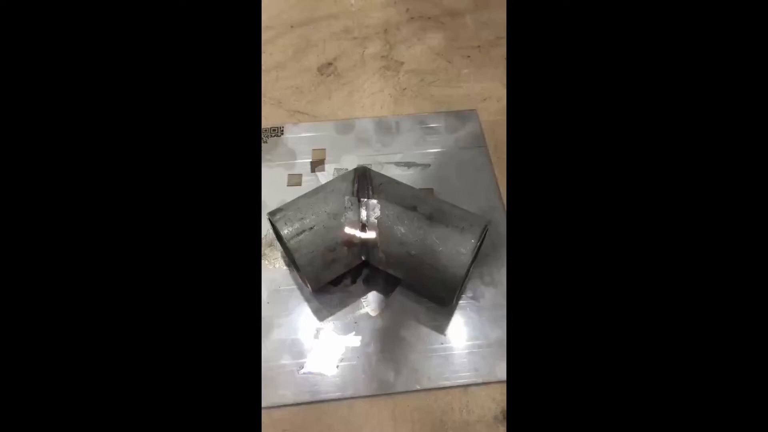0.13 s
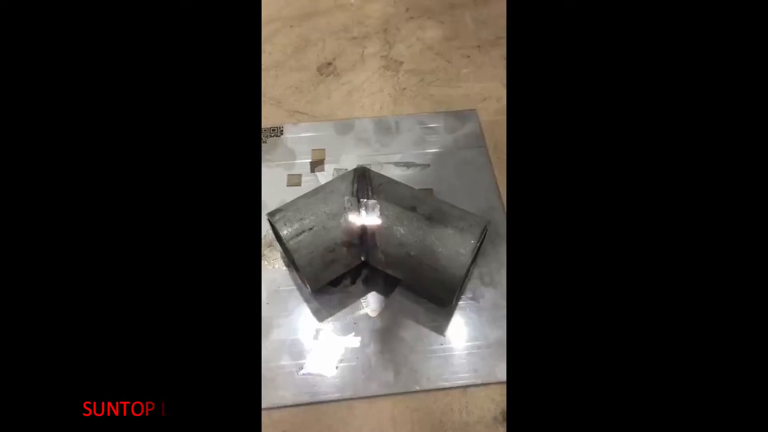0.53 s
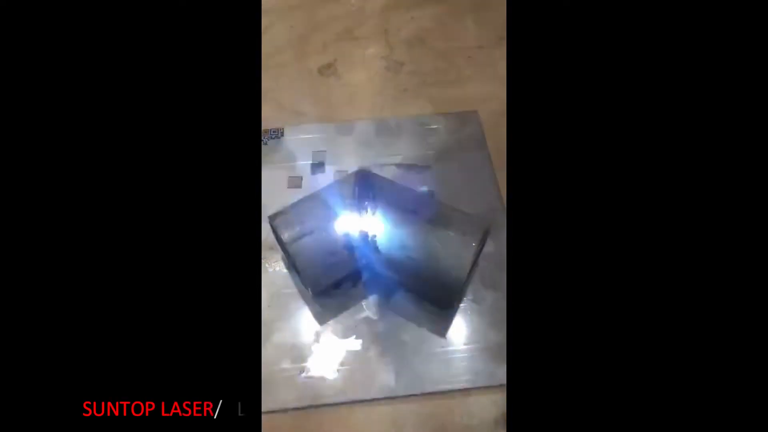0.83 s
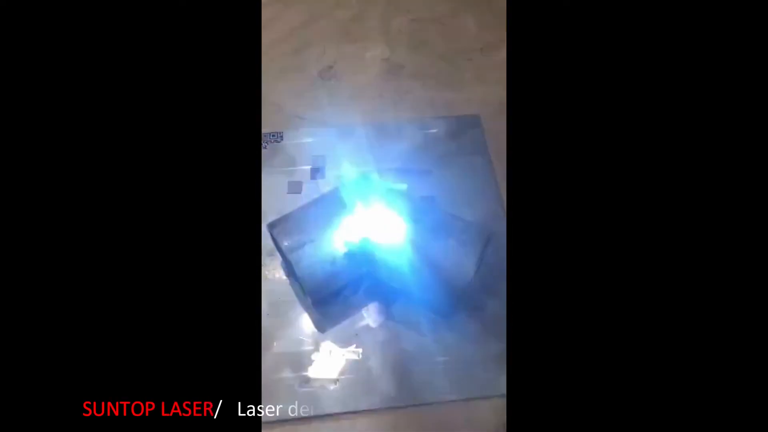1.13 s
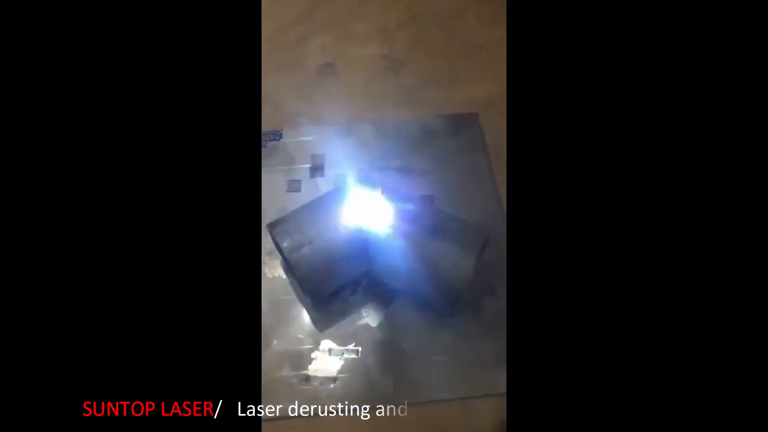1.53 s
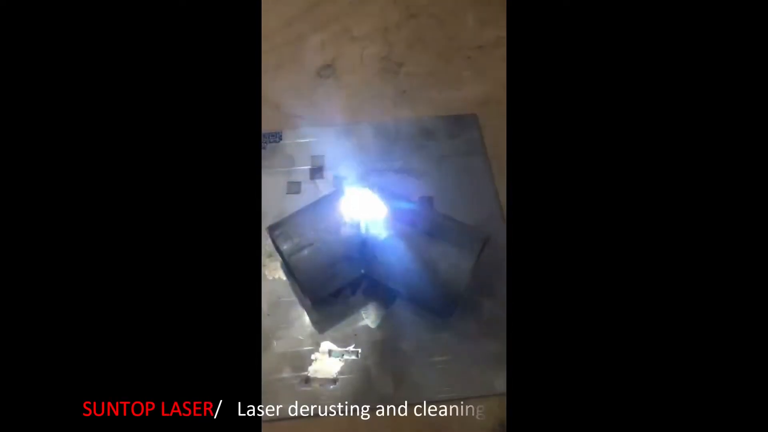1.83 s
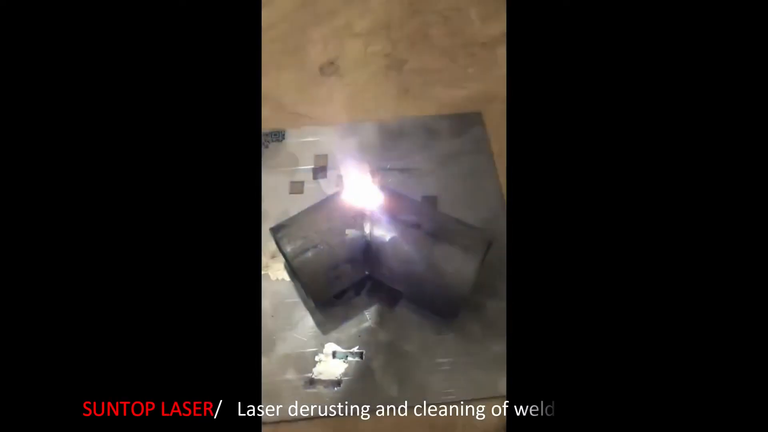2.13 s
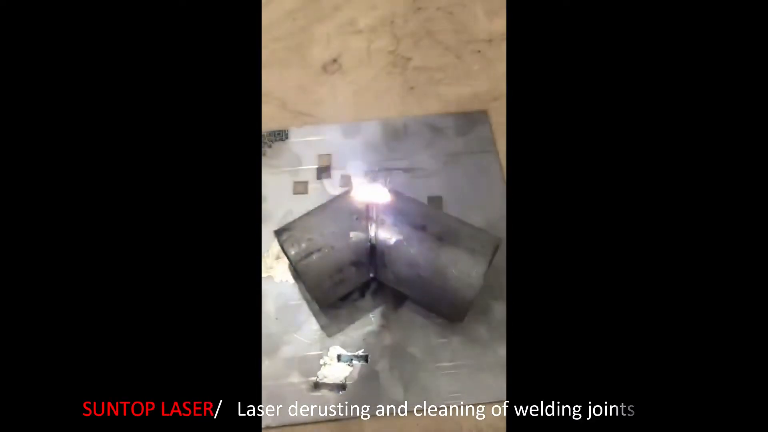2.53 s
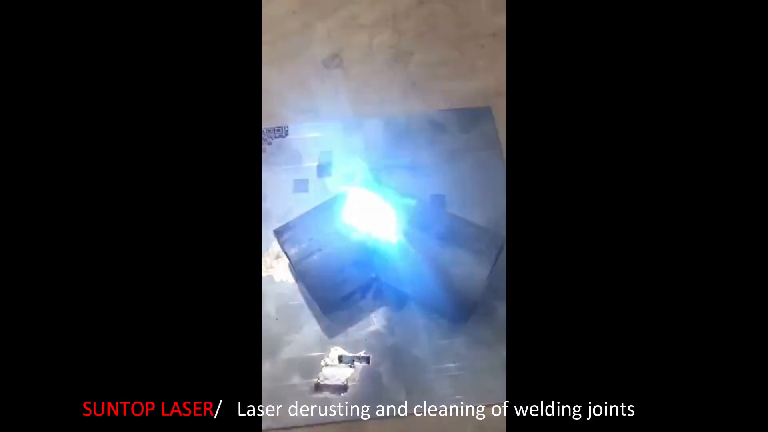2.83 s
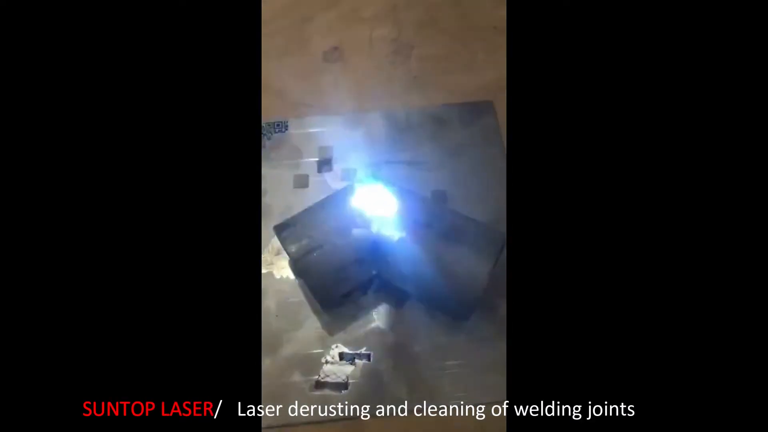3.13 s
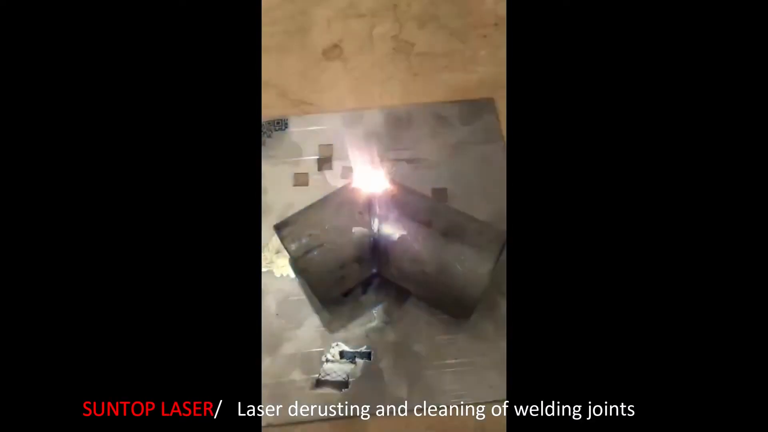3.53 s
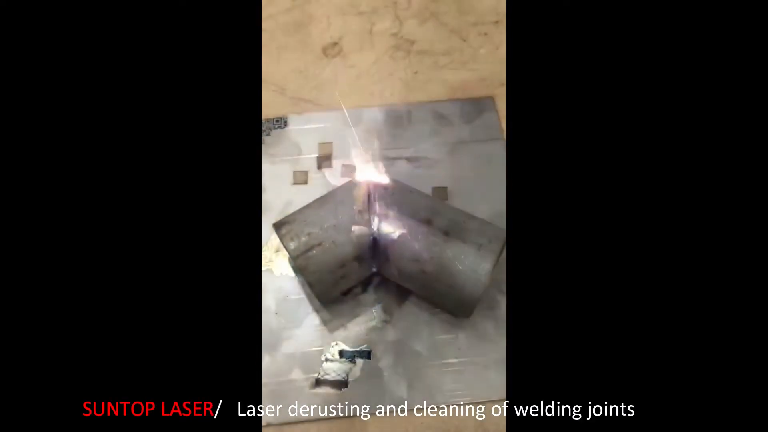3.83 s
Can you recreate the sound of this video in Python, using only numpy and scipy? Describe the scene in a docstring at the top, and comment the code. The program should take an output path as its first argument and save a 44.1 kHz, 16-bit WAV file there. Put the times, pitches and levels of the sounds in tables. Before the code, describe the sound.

A laser cleaning a steel pipe joint sizzles and hisses over a workshop fan's roar, then erupts in rough buzzing bursts and sharp cracks, loudest around two seconds and again near the end; close phone microphone, slightly overloaded.

```python
"""A sweeping pulsed laser burns a steel pipe joint clean, close to a phone microphone in a workshop.
The beam crosses the weld twice a sweep: pulses and grit pop, each crossing thumps and snaps, while noise
throbbing with the sweep makes sizzle and hiss, and sine lines whine. Lone flakes of scale crack off.
Behind is the roar of a cooling fan and extractor, coloured noise with wavering tones and a changing level.
The microphone rounds the loudest peaks and cuts the top."""
import sys
import numpy as np
from scipy import signal
from scipy.fft import rfft, irfft
from scipy.io import wavfile
from scipy.ndimage import uniform_filter1d

SR = 44100
rng = np.random.default_rng(int(sys.argv[2]) if len(sys.argv) > 2 else 0)


def output_pcm(signal):
    """Save a mono or channel-first signal as 16-bit PCM at the path in sys.argv[1].

    Samples are clipped to [-1, 1] before scaling.
    """
    pcm = np.clip(np.atleast_2d(signal).T, -1, 1) * 32767
    wavfile.write(sys.argv[1], SR, np.round(pcm).astype(np.int16))


N = 176400
t = np.arange(N) / SR

# Drift of the hand, which moves the two weld crossings apart and together.
# Each row: time in seconds, distance either side of the turning point in sweep cycles.
SEAM_DRIFT = [(1.0, 0.2), (2.15, .19), (3.3, 0.24), (3.6, 0.21)]
# Bursts on the weld. Each row: time in seconds, level of the pops in dB.
POP_LEVEL = [(1.06, -40), (1.09, -21.5), (1.13, -22), (1.15, -30), (1.3, -46.5), (1.43, -24.5), (1.51, -33),
             (1.55, -14), (1.56, -31), (1.59, -16.5), (1.6, -36), (1.7, -43), (1.72, -24.5), (1.8, -37),
             (1.82, -15.5), (1.85, -41), (1.95, -44), (1.97, -28), (2.05, -11), (2.08, -14.5), (2.1, -1.5),
             (2.12, -14), (2.14, -7), (2.157, -11), (2.165, -30), (2.175, -8), (2.18, -11), (2.28, -17),
             (2.3, -44), (2.32, -23.5), (2.36, -19.5), (2.38, -26), (2.4, -61), (2.42, -26), (2.44, -51),
             (2.63, -42.5), (2.7, -25.5), (2.76, -51), (3.06, -29), (3.21, -45), (3.24, -21), (3.29, -41),
             (3.31, -19.5), (3.38, -22.5), (3.41, -53), (3.43, -46), (3.45, -3), (3.46, -7), (3.553, -11),
             (3.56, -22), (3.58, -25), (3.6, -18.5), (3.62, -40), (3.66, -33), (3.67, -26.5), (3.7, -44),
             (3.75, -26.5), (3.78, -7.5), (3.79, -14.5), (3.815, -7), (3.822, -21), (3.84, -21),
             (3.87, -38)]
# Spectrum of the pops. Each row: frequency in Hz, density in dB per Hz.
POP_COLOUR = [(26, -70), (45, 1), (119, -2.5), (271, 0), (404, -3.5), (539, 0.5), (803, -5), (1050, -0.5),
              (1400, -8.5), (2100, -17.5), (3170, -35), (9000, -62)]
# Weight and edge of the bursts. Each row: time in seconds, low thump in dB, sharp snap in dB, both over the pops.
THUMP_SNAP_LEVEL = [(1.2, -2, -9), (1.5, -13.5, -12), (2.3, -15, -9), (2.7, -14, -3), (3.3, -4.5, -9),
                    (3.45, -2, -10.5), (3.6, -7.5, -6.5), (3.85, -7, -6)]
# Spectrum of the thump. Each row: frequency in Hz, density in dB per Hz.
THUMP_COLOUR = [(130, -2.5), (260, 0.5), (400, 3.5), (620, -11)]
# Steady burning. Each row: time in seconds, level of the sizzle in dB, level of the high hiss in dB.
BURN_LEVEL = [(0.15, -33.5, -58), (0.31, -30, -26.5), (0.37, -29, -38), (0.55, -31, -27),
              (0.71, -24.5, -19), (0.9, -32.5, -30.5), (0.99, -23, -19), (1.26, -28.5, -25),
              (1.46, -23, -19), (1.48, -17, -19.5), (1.62, -19, -20.5), (1.89, -20.5, -21),
              (2.04, -18, -19.5), (2.06, -13.5, -14), (2.1, -19.5, -22), (2.17, -27, -28.5),
              (2.21, -19, -27), (2.23, -17.5, -22.5), (2.32, -30, -32.5), (2.36, -23.5, -31.5),
              (2.39, -30, -30.5), (2.52, -38, -34.5), (2.7, -27, -22.5), (2.77, -33, -29),
              (2.92, -27.5, -23.5), (3.17, -26, -24), (3.3, -25, -24), (3.42, -29.5, -25.5),
              (3.45, -17, -16), (3.47, -11.5, -19), (3.54, -22.5, -25), (3.57, -29, -30),
              (3.65, -30.5, -32), (3.73, -30, -25.5), (3.81, -21, -20), (3.88, -30.5, -33),
              (3.944, -34, -29), (3.949, -19, -22), (3.975, -31, -34), (3.99, -33, -28), (4.0, -14, -23)]
# Spectrum of the sizzle, also of the rasp on the pops. Each row: frequency in Hz, density in dB per Hz.
SIZZLE_COLOUR = [(710, -31.5), (1200, -11), (1920, -5.5), (2010, -1), (2600, -4.5), (3000, -1),
                 (3200, -5.5), (3450, -2), (4770, -9.5), (7000, -11), (9100, -67)]
# Spectrum of the high hiss. Each row: frequency in Hz, density in dB per Hz.
HISS_COLOUR = [(2650, -5), (4500, -1), (4790, -15.5), (6210, -0.5), (6510, -15.5), (7170, -1.5),
               (10100, -3.5), (11400, -1), (14200, -4)]
# Whistling lines from the pulse rate and the sweep. Each row: frequency in Hz, relative level in dB.
WHINE_LINES = [(2062, -2), (2213, -11), (2322, 0), (2470, -10), (2738, -8), (2832, -8), (2990, -9),
               (3092, -6), (3353, -4), (4123, -10)]
# Strength of the whine. Each row: time in seconds, level over the sizzle in dB.
WHINE_LEVEL = [(.15, -12), (1.3, -13), (1.55, -5), (1.95, -1.5), (2.1, -15), (2.9, -8), (3.3, -17.5)]
# Single flakes of scale that crack off; the click sounds CRACK_DELAY_S after the time given.
# Each row: time in seconds, peak in dB ahead of the microphone.
CRACKS = [(2.177, 1), (2.185, 3), (2.418, -7), (2.691, -2), (3.447, 3), (3.566, -14), (3.59, 2.5),
          (3.625, -7), (3.632, -3.5), (3.871, -15), (3.9127, -4.5), (3.92, -15), (3.9468, 4), (3.9545, 1),
          (3.9622, 2), (3.97, -9), (3.9893, -6), (3.997, 10)]
# Spectrum of the cracks and snaps. Each row: frequency in Hz, density in dB per Hz.
CRACK_COLOUR = [(130, -2), (300, 1), (700, -1), (1500, -2.5), (3000, -6), (5000, -16.5), (10000, -32.5)]
# Fan and extractor behind. Each row: time in seconds, level of the roar with its tones in dB.
FAN_LEVEL = [(.14, -22.5), (1.0, -25), (1.54, -27), (1.93, -26), (2.1, -20.5), (2.3, -29), (2.5, -36),
             (2.75, -32.5), (3.21, -26), (3.4, -28), (3.52, -15), (3.71, -39.5), (3.82, -28), (3.88, -37.5),
             (4.0, -21)]
# Spectrum of the air roar. Each row: frequency in Hz, density in dB per Hz.
FAN_COLOUR = [(15, -41), (25, -15.5), (97, -4), (355, -16.5), (501, -16), (557, -11.5), (973, -15),
              (1140, -15.5), (1940, -19), (2160, -30), (4780, -20.5), (14200, -37)]
# Wavering tones in the roar. Each row: frequency in Hz, width in Hz, level beside the roar in dB.
FAN_TONES = [(109, 30, -0.5), (962, 3.2, -7), (994.3, 18.5, -6.5), (1953, 38, -10), (4150, 43, -17)]

PULSE_HZ, SWEEP_HZ = 1031.2, 130.2
SWEEP_SAMPLES = round(SR / SWEEP_HZ)
SWEEP_MID, SEAM_WIDTH, GLOW_WIDTH = 0.893, 0.051, 0.097  # sweep cycles: turning point, spreads about the weld
BACK_DB, THUMP_BACK_DB = -4.5, -7.5  # return crossing against the outward one
SIZE_REPEAT, POP_REPEAT, SIZZLE_REPEAT = 0.4, 0.71, 0.47  # share kept from one sweep to the next
POP_SCATTER_DB, POP_GRIT_DB, RASP_DB = 3.5, 3, -14  # pulse size, grit over pulses, bright edge
POP_LAG_HZ = 500  # corner below which the lows trail
SNAP_SCATTER_DB = 3.5
SIZZLE_GATE, HISS_GATE = 0.94, 0.36  # swell near the weld
THROB_HZ, THROB_PEAK_S, THROB_DEPTH = 21.6, 1.813, 0.61
WHINE_FLICKER_DB = 2.5
CRACK_DELAY_S, CRACK_TAIL_S, CRACK_TAIL_DB = 0.0014, 0.0037, -16.5
START_S, START_FADE_S = 0.1435, 0.00045
CLIP_AT, TOP_HZ = 1, 14050  # full-scale amplitude, microphone cutoff


def laser():
    """All the sound at the weld: bursts where scale blows off, and steady burning along the sweep."""
    effort = burst_level()
    smooth_effort = uniform_filter1d(effort, size=200)
    bursts = pops(effort)
    bursts = bursts + thump() * smooth_effort * curve(THUMP_SNAP_LEVEL)
    bursts = bursts + snaps() * smooth_effort * curve(THUMP_SNAP_LEVEL, axis=2)
    burning = (sizzle() + whine() * curve(WHINE_LEVEL)) * curve(BURN_LEVEL)
    return bursts + burning + hiss() * curve(BURN_LEVEL, axis=2)


def burst_level():
    """Gain of the bursts over time, silent outside the first and last table rows."""
    return curve(POP_LEVEL) * (t > POP_LEVEL[0][0]) * (t < POP_LEVEL[-1][0])


def pops(effort):
    """Laser pulses of uneven size and gritty noise, both strongest on the weld, coloured as pops."""
    at = np.arange(int(N / SR * PULSE_HZ)) / PULSE_HZ
    scatter = repeating(len(at), round(PULSE_HZ / SWEEP_HZ), SIZE_REPEAT)
    pulses = clicks(at, seam(at, SEAM_WIDTH, BACK_DB) * undb(POP_SCATTER_DB * scatter))
    grit = seam(t, SEAM_WIDTH, BACK_DB) * repeating(N, SWEEP_SAMPLES, POP_REPEAT)
    blows = (unit(grit) * undb(POP_GRIT_DB) + unit(pulses)) * effort
    body = colour(lows_late(blows), POP_COLOUR)
    rasp = undb(RASP_DB) * colour(blows, SIZZLE_COLOUR)
    # colour() evens out the level, so the overall strength is put back
    return (body + rasp) * np.sqrt(np.mean(effort ** 2))


def thump():
    """Low push each time the beam passes over the weld, weaker on the way back."""
    return colour(lows_late(seam(t, SEAM_WIDTH, THUMP_BACK_DB)), THUMP_COLOUR)


def snaps():
    """One sharp click each time the beam crosses the weld, weaker on average on the way back."""
    turn = (np.arange(int(N / SR * SWEEP_HZ)) + SWEEP_MID) / SWEEP_HZ
    apart = half_gap(turn) / SWEEP_HZ
    size = undb(SNAP_SCATTER_DB * rng.standard_normal((len(turn), 2)))
    outward = clicks(turn - apart, size[:, 0])
    back = clicks(turn + apart, size[:, 1] * undb(BACK_DB))
    return colour(lows_late(outward + back), CRACK_COLOUR)


def sizzle():
    """Flickering noise that partly repeats each sweep and swells near the weld."""
    swell = 1 + SIZZLE_GATE * seam(t, GLOW_WIDTH, 0)
    flicker = undb(2.02 * walk(200) + walk(14))
    return colour(swell * flicker * repeating(N, SWEEP_SAMPLES, SIZZLE_REPEAT), SIZZLE_COLOUR)


def whine():
    """Steady whistling sine lines that throb together and flicker alone."""
    throb = 1 + THROB_DEPTH * np.cos(2 * np.pi * THROB_HZ * (t - THROB_PEAK_S))
    lines = np.zeros(N)
    for hz, db in WHINE_LINES:
        level = undb(db + WHINE_FLICKER_DB * walk(24.88))
        lines += level * np.sin(2 * np.pi * (hz * t + rng.random()))
    return unit(throb * lines)


def hiss():
    """High noise that flickers freely and swells a little near the weld."""
    swell = 1 + HISS_GATE * seam(t, GLOW_WIDTH, 0)
    flicker = undb(1.32 * walk(300) + 2.0 * walk(14))
    return colour(swell * flicker * rng.standard_normal(N), HISS_COLOUR)


def cracks():
    """Lone flakes crack off: a sharp coloured click with trailing lows and a short noisy tail."""
    rows = np.array(CRACKS)
    size = 1024
    one = colour(lows_late(np.eye(1, N)[0]), CRACK_COLOUR)[:size]
    tail = np.exp(-t[:size] / CRACK_TAIL_S) * rng.standard_normal(size)
    one = one + undb(CRACK_TAIL_DB) * abs(one).max() * tail
    hits = clicks(rows[:, 0] + CRACK_DELAY_S, undb(rows[:, 1]))
    return signal.fftconvolve(hits, one / abs(one).max())[:N]


def fan():
    """Broad air roar with a rumble, and tones that waver because they are narrowly filtered noise."""
    roar = colour(rng.standard_normal(N), FAN_COLOUR) * undb(2.6 * walk(8.5))
    for hz, width, db in FAN_TONES:
        b, a = signal.iirpeak(hz, hz / width, fs=SR)
        roar = roar + undb(db) * unit(signal.lfilter(b, a, rng.standard_normal(N)))
    return unit(roar) * curve(FAN_LEVEL)


def half_gap(at):
    """Distance of the crossings from the turning point, in sweep cycles, as the hand drifts."""
    return np.interp(at, *np.array(SEAM_DRIFT).T)


def seam(at, width, back_db):
    """How squarely the beam sits on the weld: once going out, once coming back."""
    apart = half_gap(at)

    def closeness(mid):
        cycles = (SWEEP_HZ * at - mid + .5) % 1 - .5
        return np.exp(-.5 * (cycles / width) ** 2)

    return closeness(SWEEP_MID - apart) + undb(back_db) * closeness(SWEEP_MID + apart)


def repeating(count, lag, share):
    """Noise that the next sweep partly meets again, as the beam retraces the same metal."""
    a = np.zeros(lag + 1)
    a[0], a[-1] = 1, -share
    return unit(signal.lfilter([1], a, rng.standard_normal(count)))


def clicks(at, size):
    """One click at each time, shared between neighbouring samples."""
    place = np.clip(at * SR, 0, N - 2)
    k, part = place.astype(int), place % 1
    return np.bincount(k, size * (1 - part), N) + np.bincount(k + 1, size * part, N)


def lows_late(x):
    """All-pass that lets the lows trail behind the click."""
    a = np.exp(-2 * np.pi * POP_LAG_HZ / SR)
    return signal.lfilter([-a, 1], [1, -a], x)


def walk(rate):
    """Random levels held 1 / rate s and slewed; spread near 1."""
    k = int(SR / rate)
    held = np.repeat(rng.standard_normal(N // k + 1), k)
    return 1.39 * uniform_filter1d(uniform_filter1d(held, k), k)[:N]


def colour(x, points, size=2048):
    """Causal minimum-phase filter through (Hz, dB) points, falling away outside them, at unit RMS."""
    rows = np.array(points)
    hz = np.maximum(np.arange(size // 2 + 1) * SR / size, 1)
    octaves_out = np.maximum(np.log2(rows[0, 0] / hz), 0) + np.maximum(np.log2(hz / rows[-1, 0]), 0)
    db = np.interp(np.log(hz), np.log(rows[:, 0]), rows[:, 1]) - 10.7 * octaves_out
    # folding the cepstrum forward in time makes the filter causal
    cepstrum = irfft(np.log(undb(db)))
    cepstrum[1:size // 2] *= 2
    cepstrum[size // 2 + 1:] = 0
    return unit(signal.fftconvolve(x, irfft(np.exp(rfft(cepstrum))))[:N])


def curve(table, axis=1):
    """Gain over time from a dB column."""
    rows = np.array(table)
    return undb(np.interp(t, rows[:, 0], rows[:, axis]))


def undb(db):
    """Amplitude ratio from dB."""
    return 10 ** (np.asarray(db) / 20)


def unit(x):
    """Scale to an RMS of 1."""
    return x / np.sqrt(np.mean(x ** 2))


def scene():
    """Laser and cracks close by, fan behind, all starting abruptly after a short silence."""
    start = np.clip((t - START_S) / START_FADE_S, 0, 1)
    return ((laser() + cracks() + fan()) * start)[None]


def record(dry):
    """The phone microphone rounds the loudest peaks and cuts the top."""
    wet = CLIP_AT * np.tanh(dry / CLIP_AT)
    return signal.sosfilt(signal.ellip(10, .2, 80, TOP_HZ, fs=SR, output="sos"), wet)


dry = scene()
out = record(dry)
output_pcm(out)
```